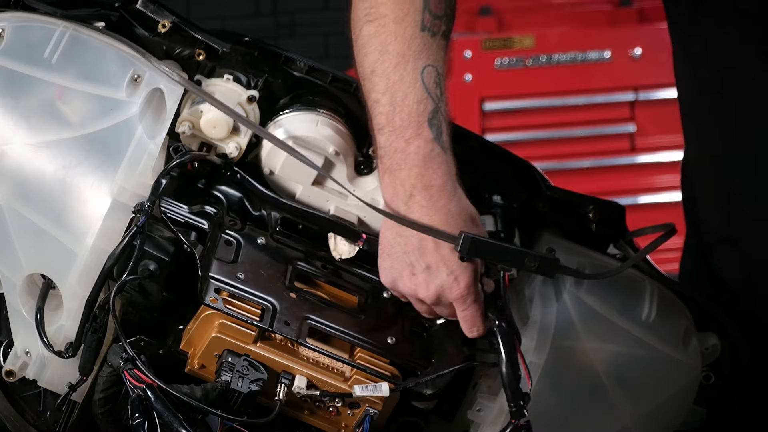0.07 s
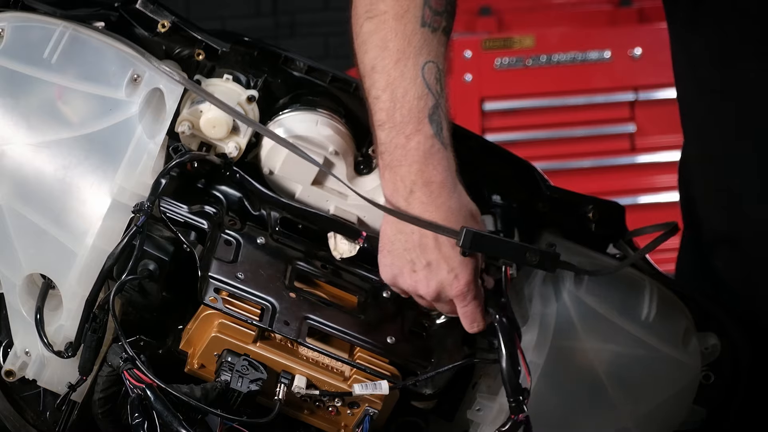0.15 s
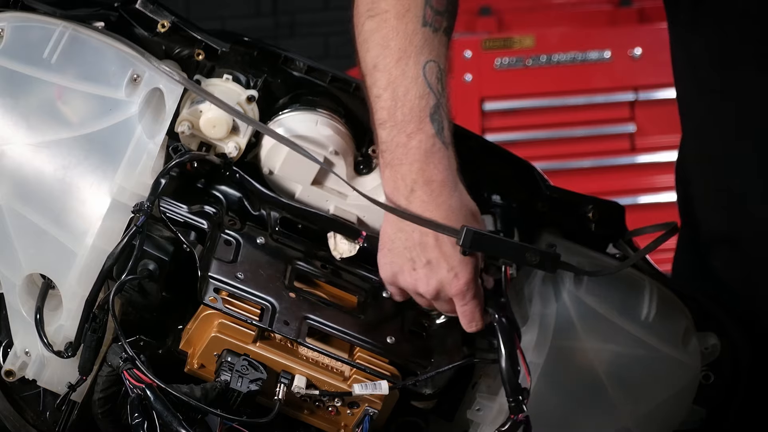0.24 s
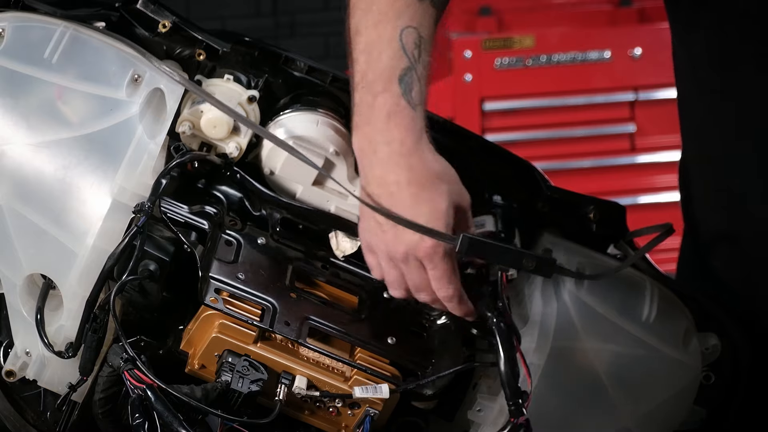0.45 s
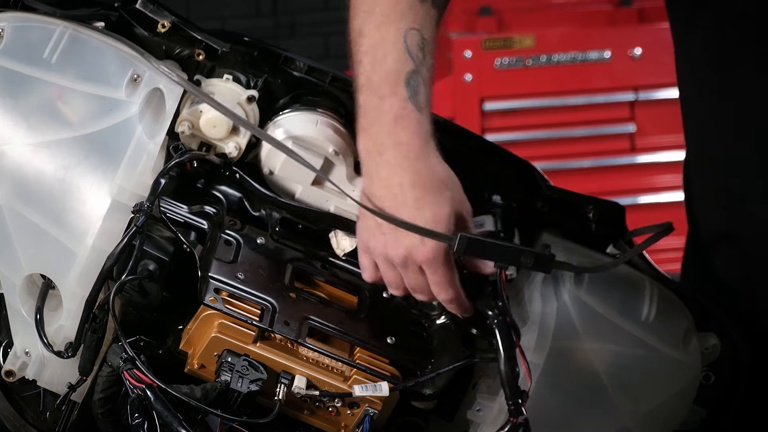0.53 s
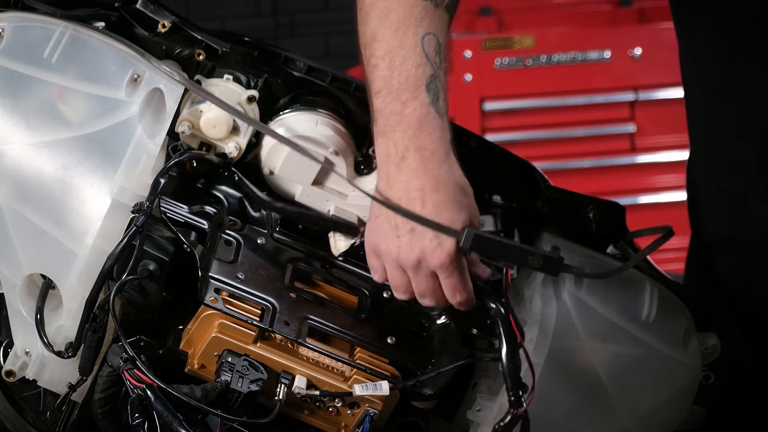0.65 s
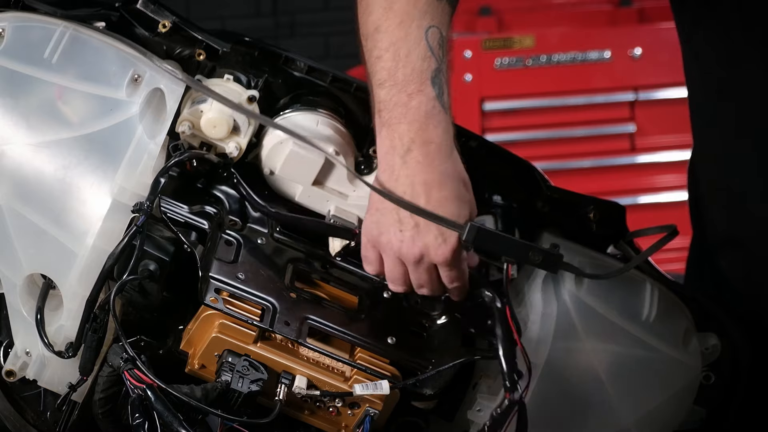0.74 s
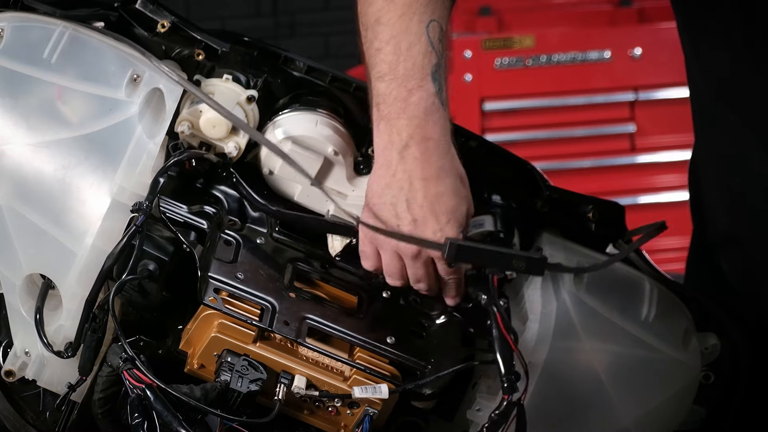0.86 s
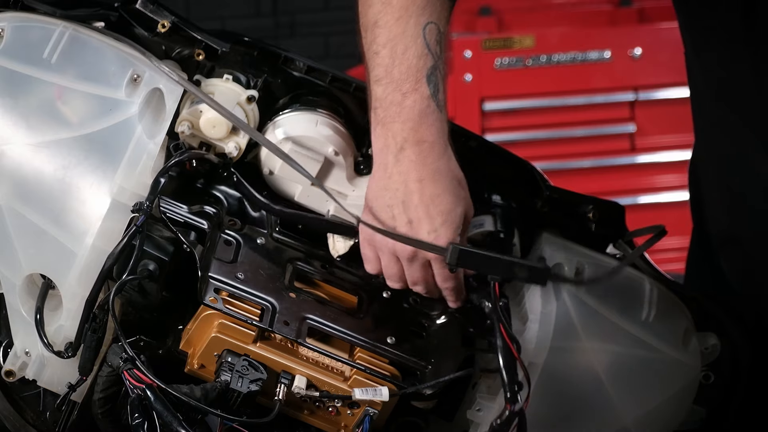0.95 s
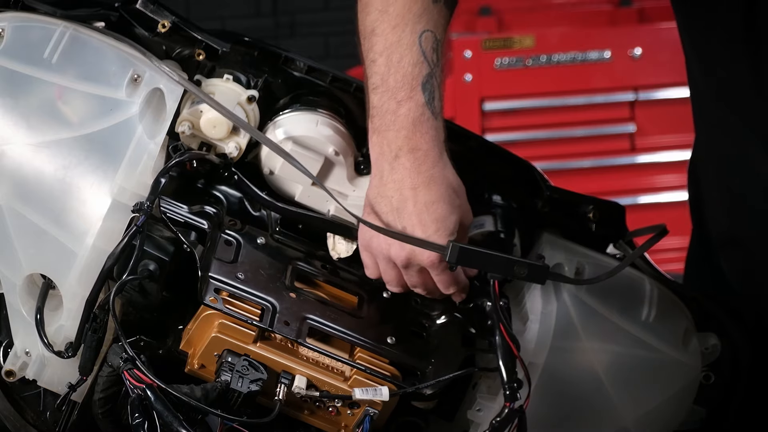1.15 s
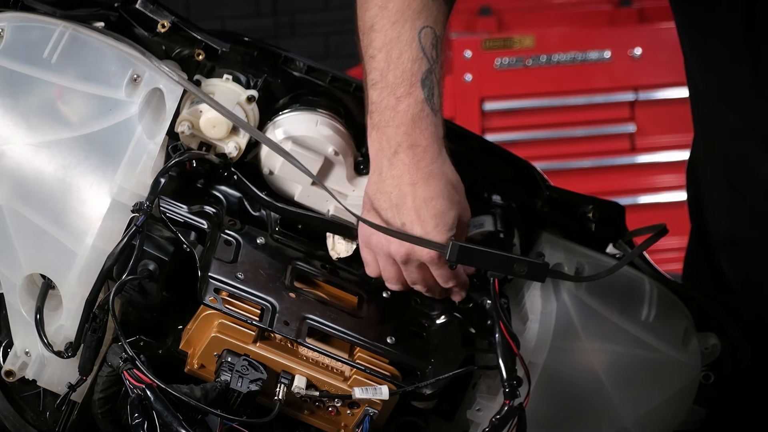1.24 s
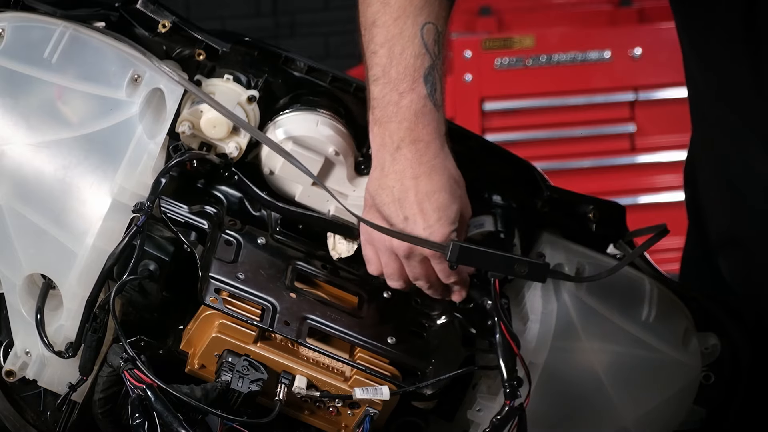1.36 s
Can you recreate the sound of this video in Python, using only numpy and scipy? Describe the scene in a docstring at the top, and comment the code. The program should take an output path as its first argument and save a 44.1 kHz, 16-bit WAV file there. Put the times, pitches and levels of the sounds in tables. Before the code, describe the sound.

One loud, crisp click of a plastic connector latch echoes in a hall, followed by quiet handling taps.

```python
"""One sharp snap that rings round a large workshop, two dull knocks and a ringing echo, light taps, soft
thuds and small ticks over a ventilation rumble: a hand works on a plastic wiring connector in an
engine bay. Latch, shell and clip are sums of decaying modes, the latch with noise added; the hall is
noise in decaying bands; ticks, knock echo and thuds are resonant noise bursts; rubbing is coloured
random grains."""
import sys
import numpy as np
from scipy import signal
from scipy.fft import rfft, irfft
from scipy.io import wavfile

SR = 44100
rng = np.random.default_rng(int(sys.argv[2]) if len(sys.argv) > 2 else 0)


def store_pcm(level_fs):
    """Save levels as 16-bit WAV."""
    pcm = np.round(np.clip(level_fs, -1, 1) * 32767).astype(np.int16)
    wavfile.write(sys.argv[1], SR, np.atleast_2d(pcm).T)


N = 61739
T = np.arange(N) / SR
HZ = np.maximum(np.fft.rfftfreq(2 * N, 1 / SR), 1)   # bins of the zero-padded FFT

# latch snap and its rebound: t/s, level/dB
SNAP_EVENTS = [(.2249, 2.5), (.2292, -15.5)]


def from_db(db):
    """Decibels to amplitude gain."""
    return 10 ** (np.asarray(db) / 20)


def rms_one(x):
    """Scale to unit rms."""
    return x / np.sqrt(np.mean(x ** 2) + 1e-20)


def at_hz(points, hz):
    """Interpolate a (f/Hz, value) table on a log-frequency axis."""
    f, value = np.transpose(points)
    return np.interp(np.log(hz), np.log(f), value)


def colour(x, spectrum):
    """Filter x by a spectrum (f/Hz, level/dB), then scale to unit rms."""
    shaped = rfft(x, 2 * N) * from_db(at_hz(spectrum, HZ))
    return rms_one(irfft(shaped)[:N])


def delay(x, delay_s):
    """Shift x later, keeping N samples."""
    lead = np.zeros(max(int(delay_s * SR), 0))
    return np.concatenate([lead, x])[:N]


def dull(x, cut_hz):
    """Second-order low-pass."""
    sos = signal.butter(2, min(cut_hz, .45 * SR), fs=SR, output="sos")
    return signal.sosfilt(sos, x)


def place(x, events):
    """Sum copies of x at (t/s, level/dB)."""
    return sum(from_db(db) * delay(x, s) for s, db in events)


def ring(modes, ratio=1):
    """Sum struck modes of alternating sign; a higher pitch ratio swells and dies sooner."""
    build_cycles = 1.6   # time constant of the swell
    out = 0
    for k, (hz, db, t60_s) in enumerate(modes):
        pitch_hz = hz * ratio
        swell = 1 - np.exp(-T * pitch_hz / build_cycles)
        decay = from_db(db - 60 * T * ratio / t60_s)
        out = out + (-1) ** k * decay * swell * np.sin(2 * np.pi * pitch_hz * T)
    return out


def noise_bands(spectrum):
    """Split coloured noise into overlapping half-octave bands: (centre/Hz, signal)."""
    whole = rfft(colour(rng.standard_normal(N), spectrum), 2 * N)
    bands = []
    for hz in 90 * 2 ** (np.arange(16) / 2):
        weight = np.maximum(0, 1 - 2 * abs(np.log2(HZ / hz)))
        bands.append((hz, irfft(whole * weight)[:N]))
    return bands


def burst(hz, q, t60_s):
    """Noise through one doubled resonance, decaying exponentially."""
    peak = signal.iirpeak(min(hz, .4 * SR), max(q, .45), fs=SR)
    once = signal.lfilter(*peak, rng.standard_normal(N))
    twice = signal.lfilter(*peak, once)
    return rms_one(twice) * from_db(-60 * T / t60_s)


def grains():
    """Random tiny slips of either sign and uneven size."""
    rate_hz, spread_db = 3700, 4
    hits = rng.random(N) < rate_hz / SR
    sign = rng.choice([-1, 1], N)
    size = from_db(spread_db * np.minimum(rng.exponential(1, N), 4))
    return hits * sign * size


def latch():
    """The snap rings latch and shell modes plus dense noise; nearby panels return duller echoes."""
    # latch and shell modes: f/Hz, relative level/dB, t60/s
    latch_modes = [(195.5, -38, 0.079), (373, -40, .06), (583.5, -40, 0.066), (843, -34.5, 0.061),
                   (1347, -17, 0.032), (1680, -31, .025), (2173, -33, .022), (2446, -25.5, 0.03),
                   (2859, -21, .018), (3120, -23.5, 0.022), (3962, -17, .022), (4190, -19.5, .018),
                   (4830, -18, 0.019), (5150, -20, .015), (5460, -12.5, 0.012), (6220, -24, .015),
                   (6730, -27.5, 0.02), (8310, -23, 0.0066), (9470, -19, .009), (10247, -26.5, 0.014),
                   (11145, -29, .01), (12350, -24, .008), (15320, -28, .015)]
    # dense ring under the modes: f/Hz, relative density/dB per Hz
    crack_spectrum = [(100, -4), (220, -9), (350, -14.5), (550, -12.5), (900, -8.5), (2000, -8), (5000, 1),
                      (6200, -4), (7400, -16), (8500, -1.5), (12500, -5.5), (13600, -18.5), (16000, -18)]
    # its decay: f/Hz, t60/s
    crack_t60 = [(200, .06), (1500, 0.062), (5000, .021), (14000, .016)]
    # panel echoes: delay/s, level/dB before the low-pass
    panel_echoes = [(.0128, -22.5), (.0152, -23), (.0205, -28.5)]
    crack_db, echo_cut_hz = -17.5, 5500

    crack = 0
    for hz, band in noise_bands(crack_spectrum):
        crack = crack + band * from_db(crack_db - 60 * T / at_hz(crack_t60, hz))
    direct = place(ring(latch_modes) + crack, SNAP_EVENTS)
    return direct + dull(place(direct, panel_echoes), echo_cut_hz)


def hall():
    """The snap hangs in the hall, sagging slowly, then dies away; air absorbs treble faster."""
    # hall sound: f/Hz, relative density/dB per Hz
    hall_spectrum = [(150, 0), (300, -13), (700, -11.5), (1110, -10.5), (1240, -1.5), (1340, 2.5),
                     (1440, 0), (1560, -14.5), (2100, -15.5), (2460, 0.5), (2950, -5), (3400, -14),
                     (3950, -6.5), (4600, -12.5), (5700, -8), (7500, -20), (10000, -11.5), (15000, -18.5),
                     (16500, -37)]
    # decay after the hold: f/Hz, t60/s
    hall_t60 = [(150, 1.0), (1300, 0.85), (2700, 0.83), (5500, .55), (12000, 0.33)]
    level_db, build_s, hold_s, sag_db_per_s = -42.5, .008, .22, 31
    air_db_per_s = 113   # at 10 kHz, growing as f squared

    held_s, late_s = np.minimum(T, hold_s), np.maximum(T - hold_s, 0)
    out = 0
    for hz, band in noise_bands(hall_spectrum):
        sag_db = sag_db_per_s * held_s
        decay_db = 60 * late_s / at_hz(hall_t60, hz)
        air_db = air_db_per_s * (hz / 10000) ** 2 * T
        out = out + band * from_db(level_db - sag_db - decay_db - air_db)
    return delay(out * (1 - np.exp(-T / build_s)), SNAP_EVENTS[0][0])


def knocks():
    """Contacts excite the modes of the plastic shell."""
    # shell contacts: t/s, level/dB, pitch ratio
    shell_events = [(1.0691, -33, 0.989), (1.0755, -41, 1.12)]
    # shell modes at ratio 1: f/Hz, relative level/dB, t60/s
    shell_modes = [(329, -9.5, .05), (560, -14.5, .05), (764, 3, .045), (880, 0, 0.022), (1075, 0, 0.023),
                   (1491, -3, .035), (1710, -4.5, .045), (2150, -5, .02), (2650, -7.5, .02),
                   (3050, -16.5, .018), (3618, -15, 0.014), (4570, -21, .015)]
    return sum(from_db(db) * delay(ring(shell_modes, ratio), s) for s, db, ratio in shell_events)


def taps():
    """Contacts excite the modes of a smaller plastic clip."""
    # clip contacts: t/s, level/dB
    tap_events = [(.0068, -47), (.0084, -33.5)]
    # clip modes: f/Hz, relative level/dB, t60/s
    clip_modes = [(1610, 0, 0.021), (2000, 2, 0.0068), (2761, -3, .02), (3240, -7, .02), (5320, -9, 0.013),
                  (9600, -27.5, 0.011)]
    return place(ring(clip_modes), tap_events)


def ticks_and_knock_echo():
    """Small ticks and one ringing echo of the knock at 1.113 s, each a brief resonant noise burst."""
    # ticks and knock echo: t/s, level/dB before the low-pass, centre f/Hz, Q, t60/s
    burst_events = [(.8075, -47.5, 1290, 2.1, 0.033), (0.8262, -42, 1160, 4.3, .035),
                    (.8312, -53.5, 5200, 0.89, 0.015), (0.8335, -57.5, 3860, 1.1, 0.015),
                    (0.8374, -54, 2630, 2.9, 0.023), (0.844, -61, 7000, 1.1, 0.01),
                    (.8548, -65, 4940, .7, 0.015), (0.8872, -59, 7940, 1.4, 0.02),
                    (.961, -65.5, 4000, .7, 0.0091), (1.0085, -64, 4200, 0.83, 0.013),
                    (1.113, -53.5, 1680, 7, 0.038), (1.2605, -53, 2710, 7.9, 0.027),
                    (1.268, -66.5, 2180, 1.7, 0.016), (1.2827, -61.5, 3700, 2.2, .025),
                    (1.2995, -61.5, 3980, .9, 0.011)]
    cut_hz = 13000
    bursts = sum(from_db(db) * delay(burst(hz, q, t60_s), s) for s, db, hz, q, t60_s in burst_events)
    return dull(bursts, cut_hz)


def thuds():
    """The cable bundle shifts: low resonant noise bursts."""
    # bundle shifts: t/s, level/dB
    thud_events = [(.0, -50), (.385, -49), (0.805, -55), (0.891, -50.5), (1.256, -55)]
    hz, q, t60_s = 152.1, 4.1, .25
    return sum(from_db(db) * delay(burst(hz, q, t60_s), s) for s, db in thud_events)


def rubbing():
    """Friction grains of the hand sliding on the cables follow its effort."""
    # hand effort: t/s, level/dB
    effort = [(0, -53), (.09, -71), (.2, -69.5), (.76, -71), (.84, -52.5), (.88, -62), (.95, -61.5),
              (1.03, -71.5), (1.11, -61), (1.2, -86), (1.28, -60), (1.4, -85)]
    # friction spectrum: f/Hz, relative density/dB per Hz
    rub_spectrum = [(100, 0), (400, 6), (1100, 4), (2000, -6), (3200, -8.5), (6000, -23.5), (12000, -33.5),
                    (16000, -54.5)]
    return colour(grains(), rub_spectrum) * from_db(np.interp(T, *np.transpose(effort)))


def scrape():
    """The connector scrapes once in its holder: brighter grains swell to a peak, then decay."""
    # scrape spectrum: f/Hz, relative density/dB per Hz
    scrape_spectrum = [(300, -18), (1100, 3), (1900, 1), (2700, 8), (5200, -4), (7000, -11), (10000, -15.5),
                       (15000, -41)]
    peak_s, rise_s, t60_s, level_db = .834, .0054, .12, -53.5
    rise = np.exp(np.minimum(T - peak_s, 0) / rise_s)
    decay = from_db(level_db - 60 * np.maximum(T - peak_s, 0) / t60_s)
    return colour(grains(), scrape_spectrum) * rise * decay


def room(x):
    """Diffuse reflections: convolve with unit-energy, low-passed, decaying noise."""
    level_db, t60_s, cut_hz = -19.5, .45, 5000
    response = dull(rng.standard_normal(N), cut_hz) * from_db(-60 * T / t60_s)
    response = response / np.linalg.norm(response)
    return from_db(level_db) * signal.fftconvolve(x, response)[:N]


def ventilation():
    """Steady noise weighted to the bass."""
    # ventilation spectrum: f/Hz, relative density/dB per Hz
    vent_spectrum = [(12, -1), (25, 5), (65, -3), (110, -9), (170, -8.5), (260, -19.5), (450, -18),
                     (750, -18.5), (1300, -26.5), (2000, -33), (3200, -38.5), (5000, -45.5), (8000, -56.5),
                     (12500, -57), (14000, -70.5)]
    level_db = -52
    return from_db(level_db) * colour(rng.standard_normal(N), vent_spectrum)


def scene():
    """Mix all sources to one channel; knocks, taps, ticks and knock echo excite the room."""
    snap = latch() + hall()
    handling = knocks() + taps() + ticks_and_knock_echo()
    mix = snap + handling + room(handling) + thuds() + rubbing() + scrape() + ventilation()
    return mix[None]


def record(dry):
    """Steep elliptic low-pass cuts the top."""
    cut_hz = 16400
    sos = signal.ellip(10, .1, 80, cut_hz, fs=SR, output="sos")   # order, ripple/dB, stopband/dB
    return signal.sosfilt(sos, dry)


dry = scene()
out = record(dry)
store_pcm(out)
```